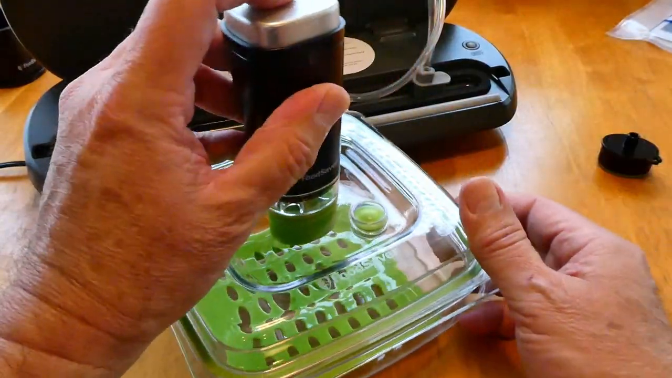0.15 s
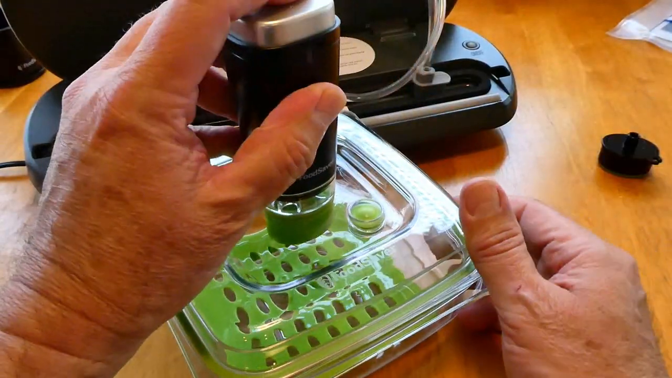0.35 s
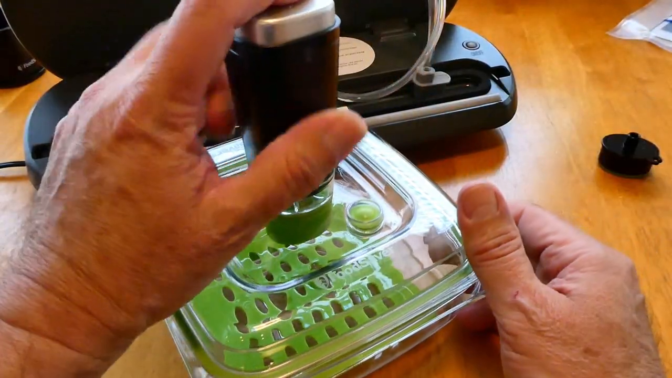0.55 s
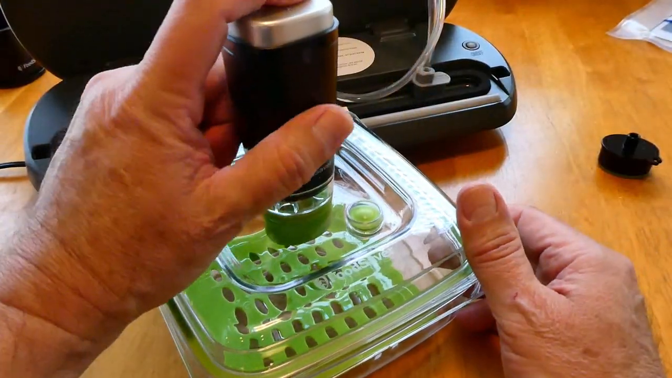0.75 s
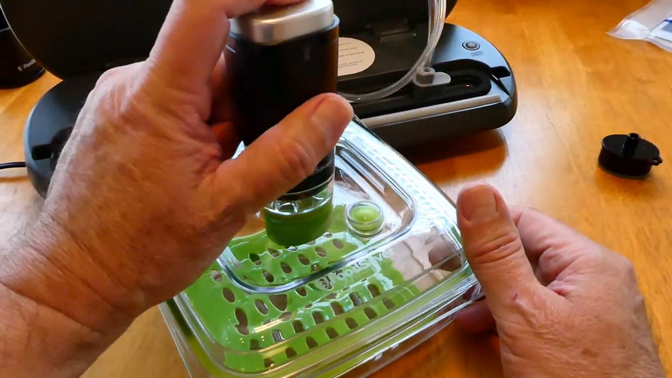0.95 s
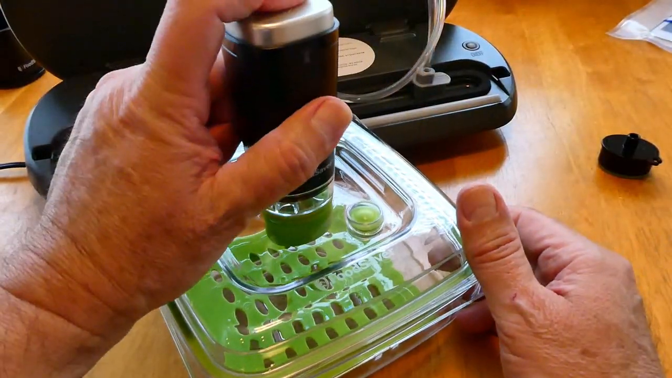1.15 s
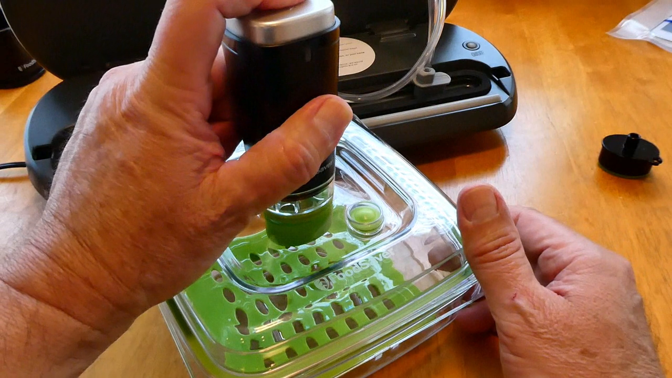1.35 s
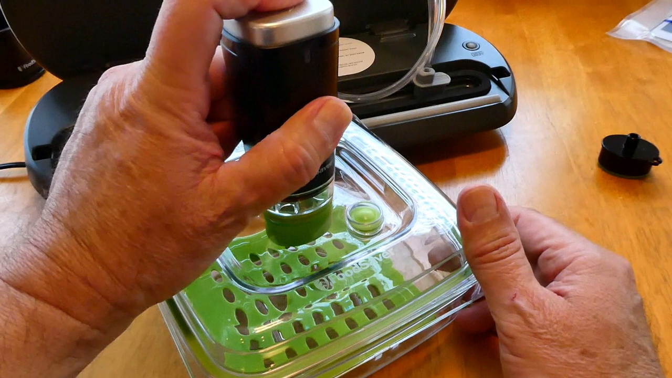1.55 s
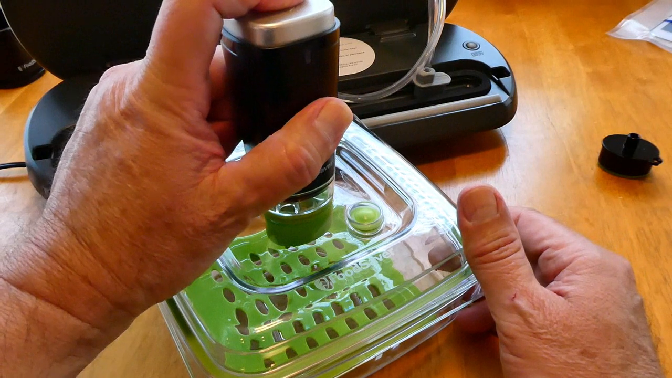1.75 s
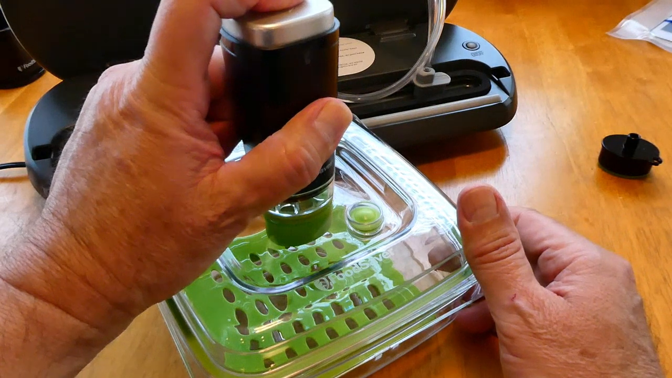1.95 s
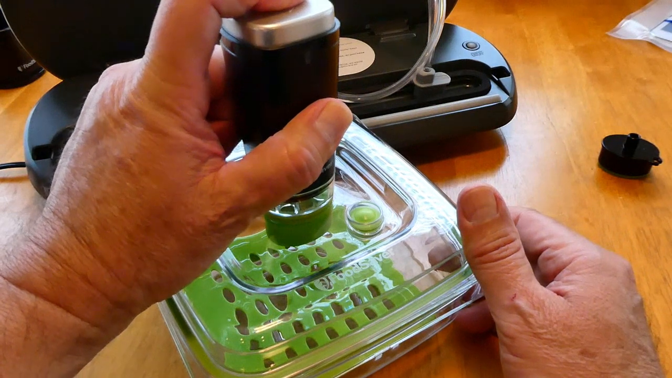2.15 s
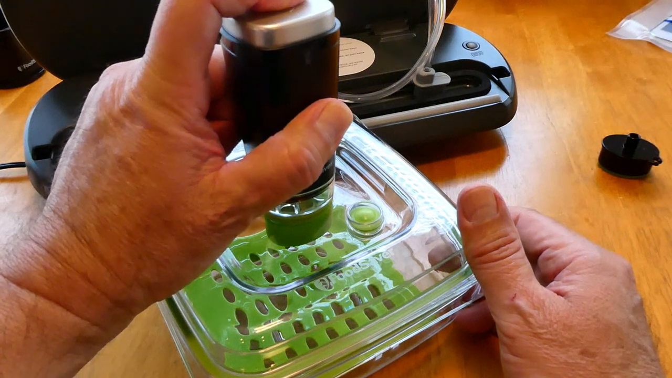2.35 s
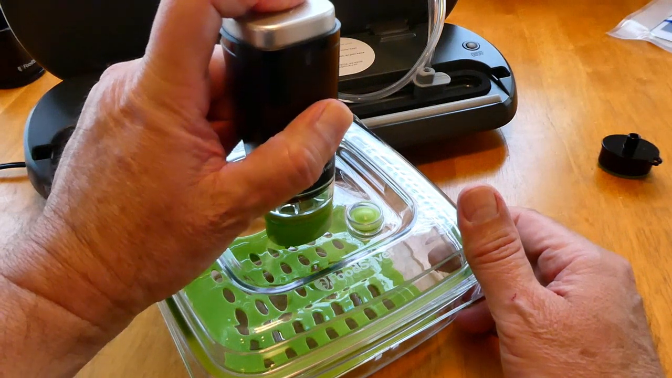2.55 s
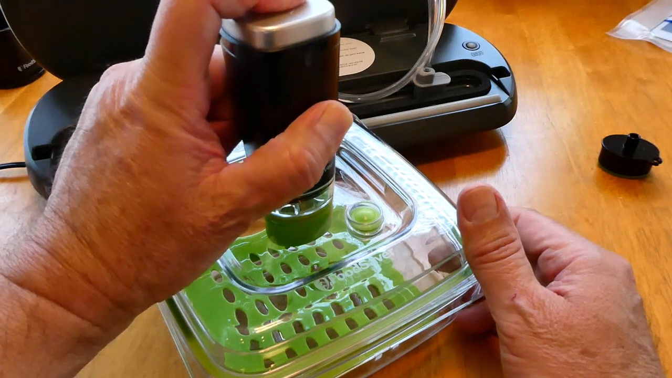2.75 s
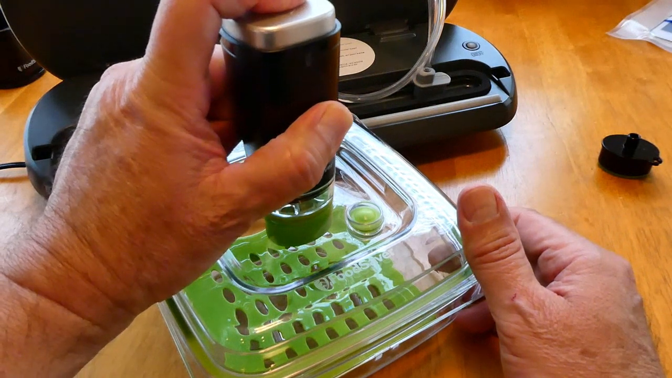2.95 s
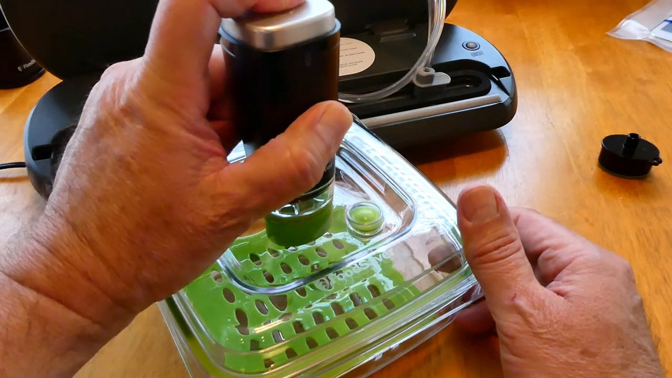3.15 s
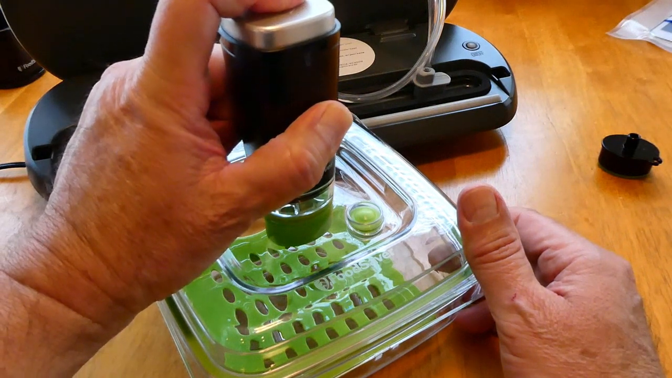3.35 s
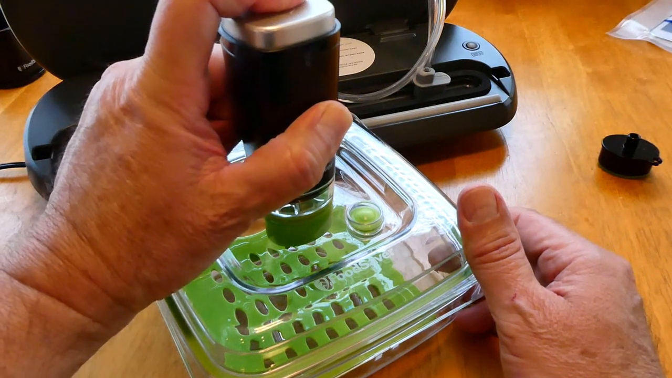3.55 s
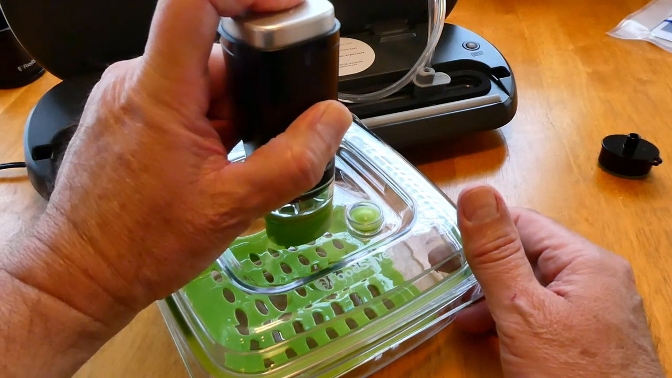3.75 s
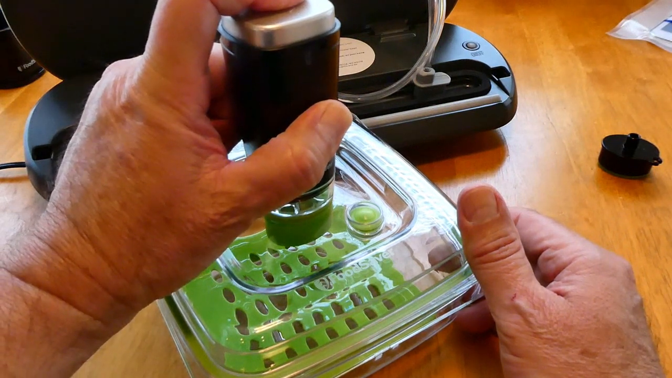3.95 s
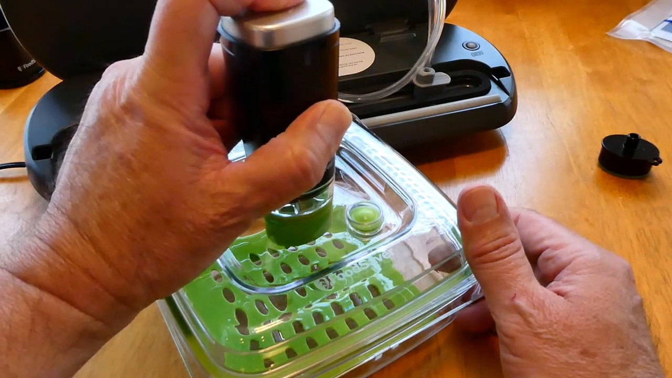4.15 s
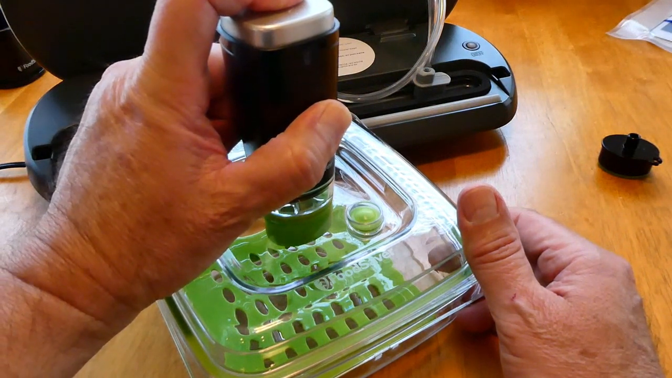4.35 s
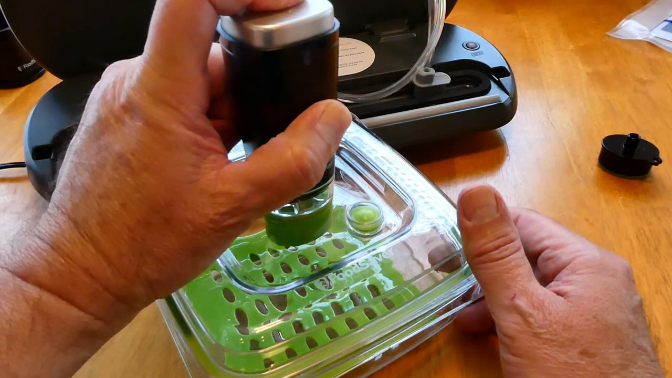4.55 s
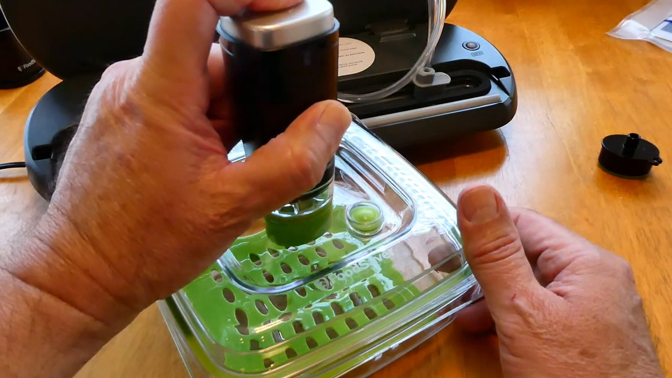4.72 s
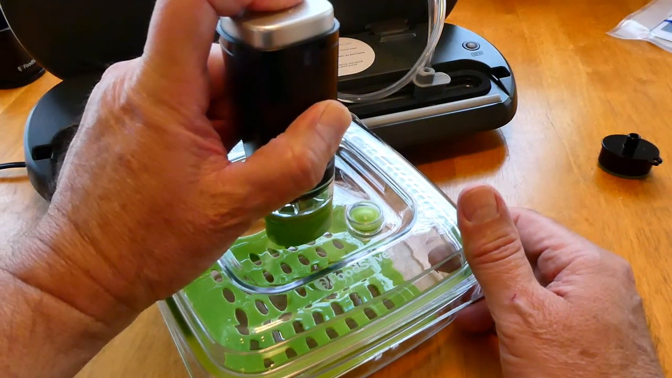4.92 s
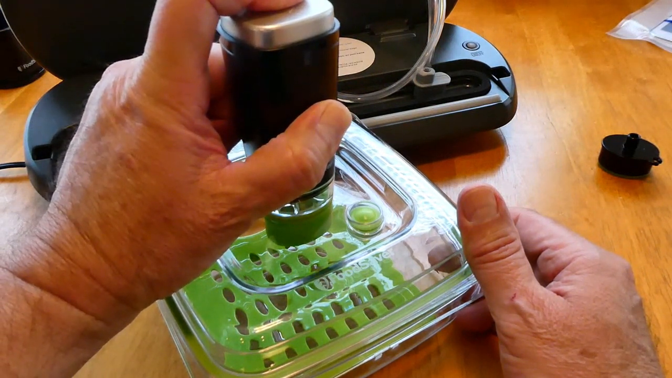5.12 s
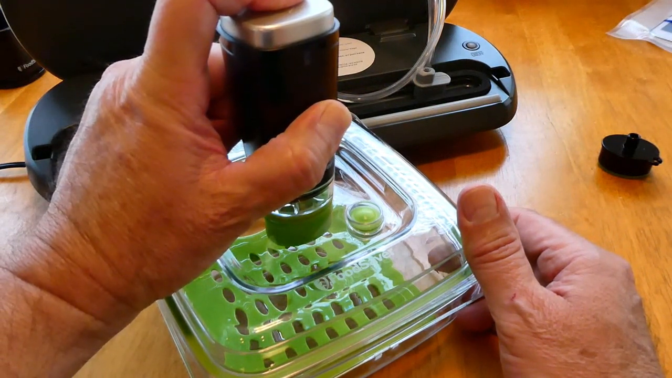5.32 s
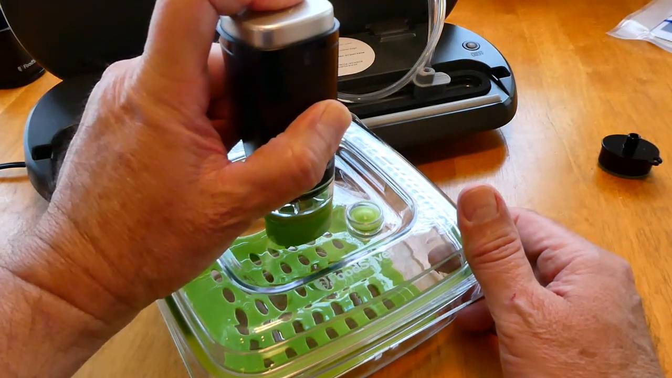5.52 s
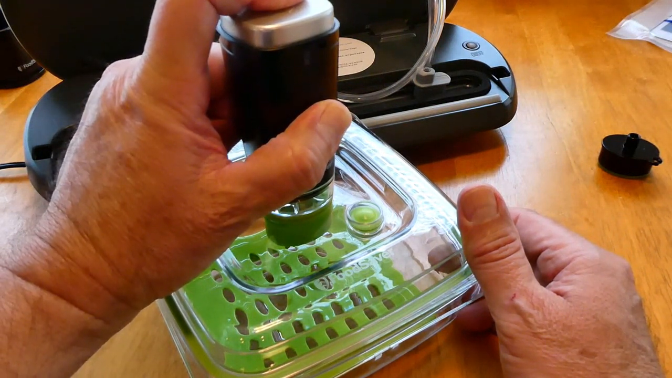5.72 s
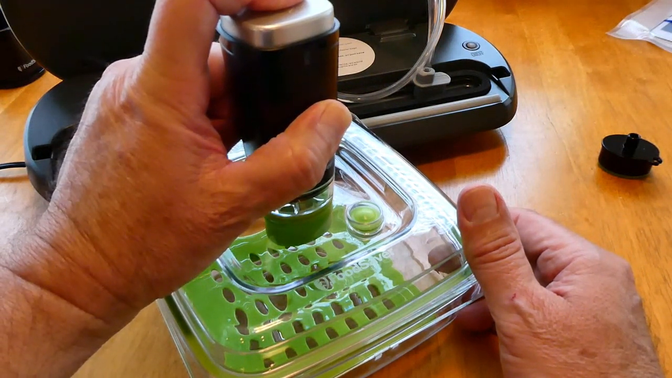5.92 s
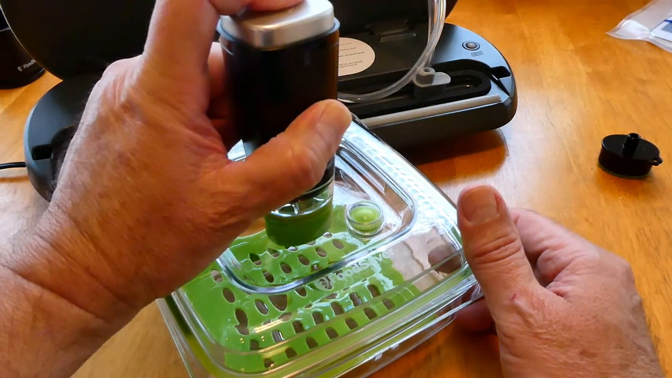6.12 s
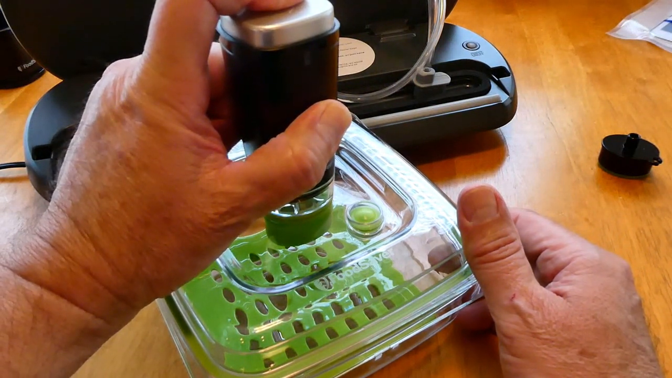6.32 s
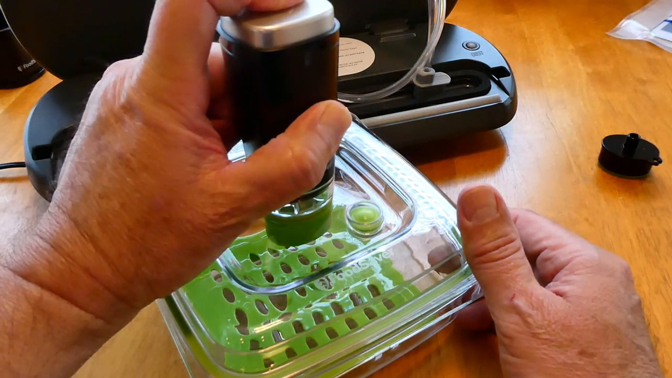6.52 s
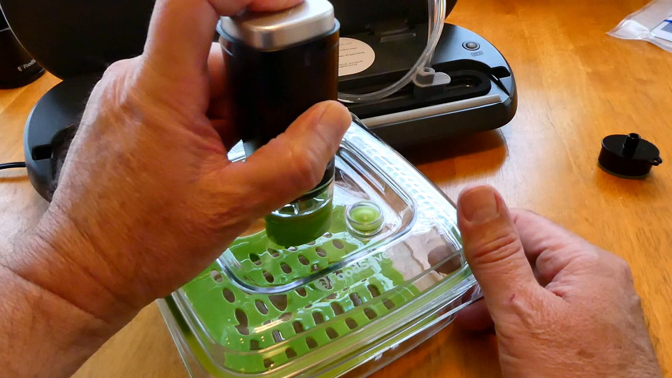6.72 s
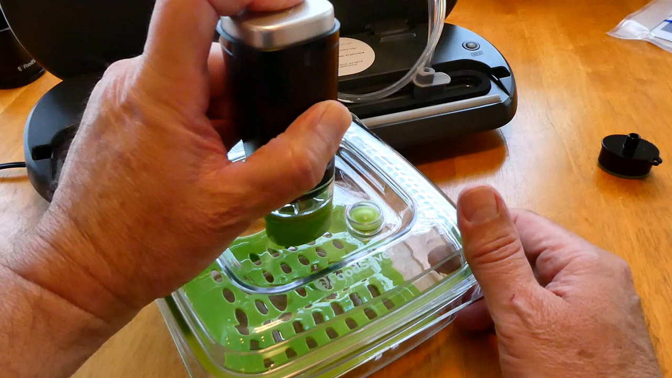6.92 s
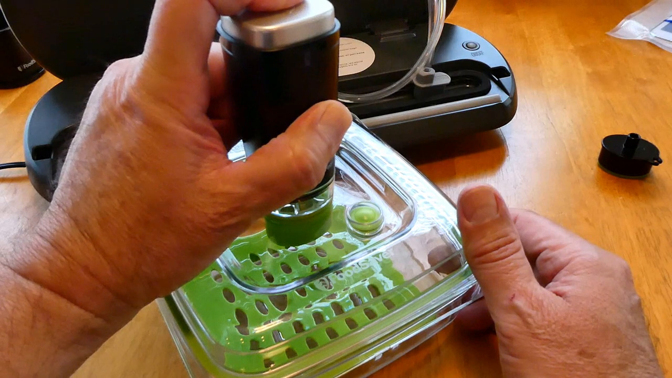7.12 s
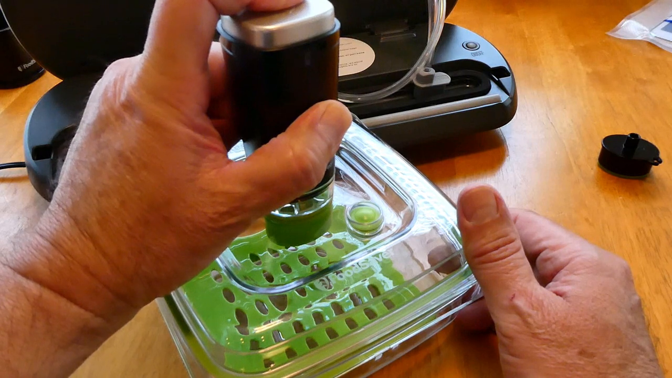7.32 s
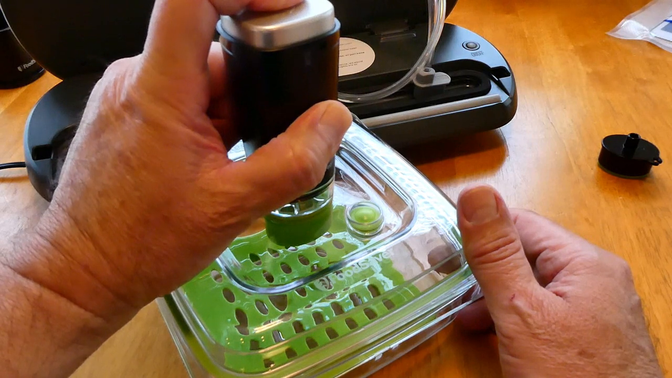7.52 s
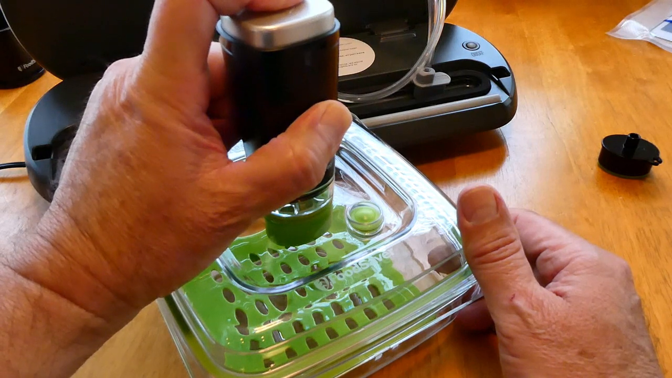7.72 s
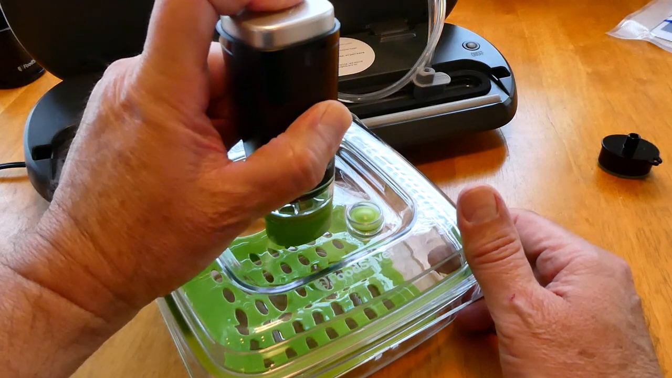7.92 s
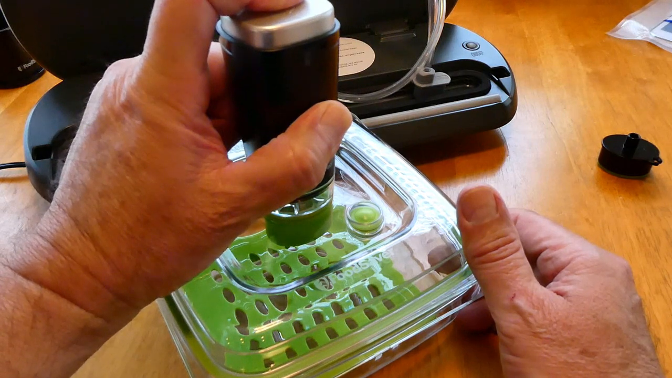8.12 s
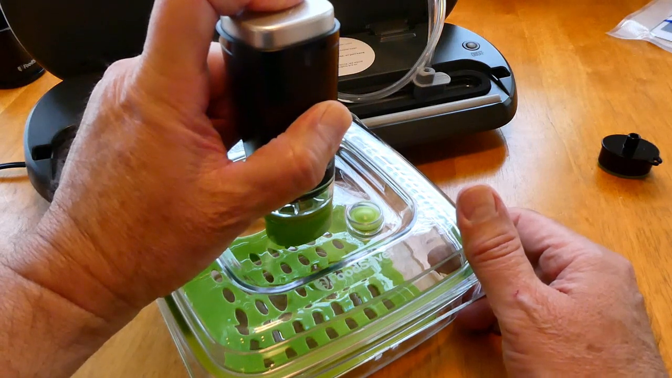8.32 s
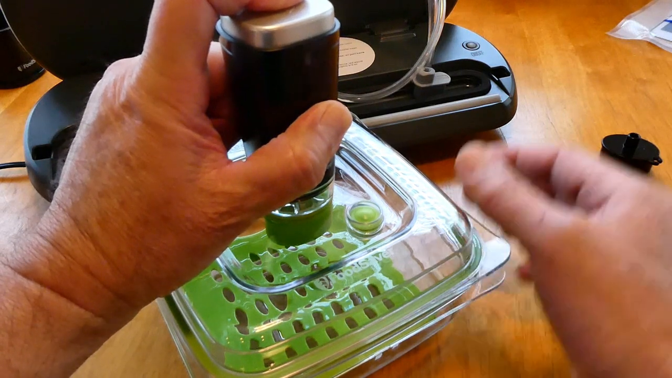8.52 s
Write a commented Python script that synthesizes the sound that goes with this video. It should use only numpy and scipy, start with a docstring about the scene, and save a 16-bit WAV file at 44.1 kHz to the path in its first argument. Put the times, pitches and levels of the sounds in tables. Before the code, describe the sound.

A plastic container slides and clicks on a table, then a small vacuum pump spins up and runs with a steady buzz.

```python
"""In a small room a plastic food container slides to rest on a table, excited by friction, while a cordless
vacuum pump bumps and clicks onto its lid. At about 1 s the motor spins up and drives a small piston,
three turns to a stroke: the gears rattle, the brushes fizz and periodic knocks make the housing buzz.
From about 1.5 s the lid is sealed, and the buzz changes colour as the vacuum builds. The plastic clicks
twice more, and the pump runs on at a nearly steady speed."""
import sys
import numpy as np
from scipy import signal
from scipy.fft import rfft, irfft, next_fast_len
from scipy.io import wavfile
from scipy.ndimage import map_coordinates

SR = 44100
rng = np.random.default_rng(int(sys.argv[2]) if len(sys.argv) > 2 else 0)


def generate_wav(sig):
    """Save sig (samples, or channels by samples) to the path in sys.argv[1] as 16-bit PCM at SR."""
    pcm = np.round(np.clip(np.atleast_2d(sig).T, -1, 1) * 32767).astype(np.int16)
    wavfile.write(sys.argv[1], SR, pcm)


N = 377937

# Likeness of the left and right noise (f/Hz, correlation)
COHERENCE = [(60, -0.69), (150, -0.099), (300, 0.34), (600, 0.11), (1300, 0.48), (2600, 0.71), (6000, 0.95),
             (14000, 0.71)]
# Spectra of room tone and of sliding friction (f/Hz, density level/dB)
AIR_SPECTRUM = [(25, -49), (50, -21), (100, -11.5), (150, -2.5), (220, -2.5), (300, 0), (450, -2),
                (750, -4), (1100, -16.5), (2300, -11), (3500, -26.5), (7000, -34), (15500, -33)]
FRICTION_SPECTRUM = [(30, -60), (90, -41), (200, -8), (380, -0.5), (550, -2.5), (1100, 0), (1600, -5),
                     (1900, -11), (4000, -13), (5500, -20.5), (10000, -26.5), (15500, -37)]
# Resonances of the room and of the container (f/Hz, half width/Hz, gain/dB)
ROOM_MODES = [(300, 20, 4.5), (385, 15, 1.5), (770, 31, 5)]
CONTAINER_MODES = [(233, 20, 12), (373, 23, 11), (687, 29, 9), (766, 16, 10), (894, 25, 2),
                   (1090, 16, 12.5)]
# Scrapes of fingers and pump foot on the lid (t/s, half length/s, level/dB)
RUBS = [(.17, 0.043, -50), (.23, 0.028, -51), (.305, 0.045, -51), (0.44, 0.018, -63), (.76, 0.026, -68)]
# Impacts of the pump's foot on the lid (t/s, level/dB)
TAPS = [(0.0532, -29), (.3285, -41), (0.7217, -37.5)]
# Booms of the settling container (t/s, level/dB, f/Hz)
BUMPS = [(.068, -37, 225), (.125, -37.5, 232), (.548, -43, 298), (.882, -44, 296)]
# Clicks of pump and lid (t/s, level/dB, relative thud level/dB, tilt/(dB per octave))
CLICKS = [(.1086, -25, -25, 4), (.1095, -14.5, -27, 1.5), (.1106, -14.5, -27, -1.5), (.119, -32, -10, -1),
          (.1517, -32, -8, 1.5), (.253, -35, -12, 2), (.329, -40, -8, 2), (.5405, -34.5, 0, 1),
          (.5457, -37.5, 0, 0), (.558, -43, 13, 4), (.5725, -38, 0, 6), (.599, -36, -11, -1),
          (.6517, -32, -18, -2), (.653, -36, -17, 2), (.888, -60, 22, 0), (1.979, -27, -15, 3),
          (2.591, -26, -12, 3)]
# Spectra of a tap, of snapping plastic and of the knocked container (f/Hz, density level/dB)
TAP_SPECTRUM = [(200, -16), (800, 2), (1400, -1), (2100, 1), (3200, -12), (6000, -26), (9000, -36),
                (15500, -46)]
SNAP_SPECTRUM = [(300, -30), (1600, -8), (2100, 2), (2650, 10), (3200, 2), (4400, -1.5), (5700, -1.5),
                 (7200, -4.5), (9300, 2.5), (10800, 0), (12000, -10), (15500, -13)]
THUD_SPECTRUM = [(30, -55), (80, -33), (230, 8), (750, 1), (1100, -7), (2200, -11), (4000, -33),
                 (12000, -47)]
# Modes of the lid (f/Hz, relative level/dB, T60/s)
LID_MODES = [(2140, -27.5, 0.15), (2770, -30, .08), (3830, -36, .08)]
# Reverberation time of the room (f/Hz, T60/s)
ROOM_T60 = [(200, 0.35), (2500, 0.34), (7000, 0.31), (14000, 0.28)]
# Piston speed: spin-up, a step as the lid seals, a slow sway with the load (t/s, stroke rate/Hz)
STROKE_RATE = [(1.03, 58.6), (1.2, 62.66), (1.3, 63.76), (1.38, 64.75), (1.55, 64.57), (1.62, 65.62),
               (1.71, 65.6), (1.81, 65.96), (2.25, 66.78), (2.43, 66.76), (2.67, 67.04), (3.05, 66.82),
               (3.35, 67.13), (3.75, 67.21), (4, 67.07), (4.2, 67.2), (4.57, 67.25), (4.7, 67.05),
               (5.3, 67.12), (6.2, 67.03), (6.7, 67.18), (7.3, 66.93), (7.5, 67.02), (8, 66.95),
               (8.3, 67.03), (8.55, 66.95)]
# Spectra of loose gears and of brush and air fizz (f/Hz, density level/dB)
GEAR_SPECTRUM = [(90, -12), (170, -2.5), (300, -3), (500, -1), (750, -0.5), (1000, 1.5), (1400, 0.5),
                 (1800, -2.5), (2300, -1), (2750, 0), (3020, -1), (3300, -30), (6000, -38)]
FIZZ_SPECTRUM = [(1500, -46), (3100, -1), (3750, -5), (4500, -2.5), (5200, -4.5), (6000, -2.5), (6750, 0.5),
                 (7300, -8), (9000, -5.5), (9800, -10), (10800, -3.5), (12000, -5), (13000, -1.5),
                 (13500, -4), (15500, -9.5)]
# Resonances of the pump case and in the fizz (f/Hz, half width/Hz, gain/dB)
CASE_MODES = [(904, 21, 4.5), (2670, 60, 3.5)]
FIZZ_PEAKS = [(6600, 380, 1.5), (10950, 350, 4.5), (14870, 280, 16.5)]
# Stroke harmonics (order, level in free air/dB, level under vacuum/dB, left minus right/dB)
HARMONICS = [(3, -54, -50.3, 0), (6, -59, -53, 0), (9, -46.5, -56.5, 2), (10, -62, -54.5, -2),
             (11, -61, -53.5, -1), (12, -44, -46.7, -1), (13, -63, -51, 0), (14, -40.5, -47, -1),
             (15, -44, -44, -3), (16, -55, -58.5, 2), (17, -70, -51, 1), (18, -58, -49.5, -6),
             (19, -61, -64, 0), (20, -54, -50, -1), (21, -50, -49, -2), (23, -56, -50.5, -1),
             (24, -58, -61, 0), (25, -56, -68, 0), (26, -55, -68, 0), (27, -71, -61, 0), (29, -59, -57, -1),
             (31, -66, -61, 0), (32, -61, -54, -1), (33, -47.5, -58, 0), (34, -54, -46, 1),
             (35, -54, -55, -4), (36, -51, -49.5, -4), (37, -45.5, -43.5, -2), (38, -55, -58, 0),
             (39, -49, -44, 1), (40, -54, -50.5, 0), (41, -43.5, -45, 1), (42, -53, -60, 3),
             (43, -51, -56.5, 1), (45, -48, -55, 2)]
# Piston and valve contacts via body and housing, valves flapping freely (phase/strokes, level/dB)
FREE_BODY_KNOCKS = [(.17, -1), (.26, 0), (.72, -5), (.88, -2)]
FREE_HOUSING_KNOCKS = [(.47, -2), (.58, -2), (.72, 0), (.83, 0)]
# The same contacts once the vacuum holds the valves (phase/strokes, level/dB)
LOADED_BODY_KNOCKS = [(.098, 0), (.169, 0), (.702, 1), (.846, 0)]
LOADED_HOUSING_KNOCKS = [(.129, -3), (.201, -4), (.799, 0), (.976, -1)]
# Harmonics that bloom or fade during spin-up and while the pump runs (order, t/s, half length/s, gain/dB)
SWELLS = [(12, 1.15, .15, -8), (29, 1.15, .08, 8), (33, 1.15, .15, -8), (37, 1.15, .15, -6),
          (9, 1.85, .2, 4), (15, 2.0, .25, -5), (18, 2.0, .35, -11), (19, 1.8, .2, 14), (23, 2.05, .35, 7),
          (24, 2.4, .6, 10), (41, 1.74, .15, 4), (42, 1.72, .12, 7), (34, 1.9, .25, 5), (40, 1.8, .2, 6),
          (41, 2.2, .25, -7), (13, 2.1, .9, 4), (35, 2.0, .25, 6), (21, 2.4, .25, 4), (45, 2.2, .7, -9),
          (33, 2.6, .6, 7), (38, 2.7, 1.3, -10), (32, 2.8, 2, -5), (37, 2.6, .6, 1.5), (14, 3.2, 1.5, 6),
          (20, 3.3, 1.2, -8), (39, 3.4, .7, 3.5), (34, 3.7, .55, 4), (40, 3.8, 1.4, 6), (41, 3.4, .9, 3),
          (37, 4.9, .9, -4), (18, 5.3, 1, -4), (23, 3.8, .8, -3), (15, 8.3, .8, 2)]

START_S, SEAL_S = 1.03, 1.53  # the pump is switched on; the lid seals
NOISE_RISE_S, TONE_RISE_S, SETTLE_S = 0.061, 0.1, 0.48  # noise arrives, buzz forms, chatter ends
FREE_HZ, FULL_HZ = 64.8, 67.25  # stroke rate in free air and under vacuum


def amp(db):
    """Amplitude ratio of a level in decibels."""
    return 10 ** (np.asarray(db) / 20)


def along(points, hz):
    """Interpolation of (f/Hz, value) points on a logarithmic frequency axis."""
    f, v = np.transpose(points)
    return np.interp(np.log(hz + 1), np.log(f + 1), v)


def resonance_db(peaks, hz):
    """Gain of a set of resonances, each a Lorentzian peak in decibels."""
    return sum(db / (1 + ((hz - centre) / width) ** 2) for centre, width, db in peaks)


def since(s):
    """Seconds elapsed since time s, zero before it."""
    return np.maximum(np.arange(N) / SR - s, 0)


def rise(s, lag_s):
    """First-order step response from 0 to 1, beginning at time s."""
    return 1 - np.exp(-since(s) / lag_s)


def bell(s, width_s):
    """Gaussian envelope centred on time s."""
    return np.exp(-((since(0) - s) / width_s) ** 2)


def wobble(rate):
    """Smooth random modulation: a spline through `rate` Gaussian knots a second."""
    knots = rng.standard_normal(int(N * rate / SR) + 4)
    coarse = np.linspace(0, N, 8 * len(knots))
    return np.interp(np.arange(N), coarse, map_coordinates(knots, [coarse * rate / SR]))


def filtered(x, response):
    """Linear filtering: the spectrum of x times a frequency response."""
    m = next_fast_len(N + SR // 2)
    return irfft(rfft(x, m) * response(np.fft.rfftfreq(m, 1 / SR)), m)[..., :N]


def noise(spectrum, peaks=(), gate=1, ripple_db=0):
    """Source and filter: gated white noise, coloured into partly coherent stereo of rms 1."""
    def colour(hz):
        grid = np.arange(0, SR / 2, 45)
        ripple = ripple_db * np.interp(hz, grid, rng.standard_normal(len(grid)))  # many small resonances
        db = along(spectrum, hz) + resonance_db(peaks, hz) + ripple
        spread = np.arccos(np.clip(along(COHERENCE, hz), -1, 1)) / 2
        return amp(db) * np.array([np.cos(spread), np.sin(spread)])
    mid, side = filtered(gate * rng.standard_normal((2, N)), colour)
    stereo = np.array([mid + side, mid - side])
    return stereo / np.sqrt(np.mean(stereo ** 2) + 1e-20)


def room_tone(level_db=-48.5):
    """Standing waves of the room colour a steady background noise."""
    return amp(level_db) * noise(AIR_SPECTRUM, ROOM_MODES)


def slide(push_end_s=0.063, stop_s=0.094, squeak_hz=1077, squeak_stop_s=0.023):
    """Friction excites the container's modes and its foot squeaks; both decay after the push."""
    coasting = since(push_end_s)
    judder = amp(-39.5 + 2 * wobble(58)) * np.exp(-coasting / stop_s)
    cycles = squeak_hz * since(0) + 0.15 * wobble(42)
    squeak = amp(-46.5) * np.exp(-coasting / squeak_stop_s) * np.sin(2 * np.pi * cycles)
    return judder * noise(FRICTION_SPECTRUM, CONTAINER_MODES, gate=amp(0.5 * wobble(295))) + squeak


def fingers(release_s=0.27, grain_db=2.0):
    """Friction of fingers on plastic, with a few short scrapes, fades once the pump runs."""
    grip = amp(-56 + wobble(12.7)) * np.exp(-since(START_S) / release_s)
    scrapes = sum(amp(db) * bell(s, width) for s, width, db in RUBS)
    return (grip + scrapes) * noise(FRICTION_SPECTRUM, gate=amp(grain_db * wobble(500)))


def taps(t60=0.017):
    """Heavily damped impacts: the pump's foot meets the lid with a dull clack."""
    envelope = sum(amp(db - 60 * since(s) / t60) * (since(s) > 0) for s, db in TAPS)
    return envelope * noise(TAP_SPECTRUM)


def reverberation(x):
    """A diffuse field decays exponentially, the treble soonest."""
    hz, t, spectra = signal.stft(rng.standard_normal((2, SR // 2)), SR, nperseg=256)
    decay = amp(-60 * t / along(ROOM_T60, hz)[:, None])
    tail = signal.istft(spectra * decay, SR, nperseg=256)[1]
    return signal.fftconvolve(x.mean(axis=0)[None], tail / np.linalg.norm(tail[0]), axes=1)[:, :N]


def bumps(t60=0.15, attack_s=0.008):
    """Damped free vibration: the hollow container rocks and booms in one low mode at a time."""
    return sum(amp(db - 60 * since(s) / t60) * rise(s, attack_s) * np.sin(2 * np.pi * hz * since(s))
               for s, db, hz in BUMPS)


def snap(tilt_db, t, crumble_db=-7, crumble_t60=0.007):
    """Impulse response of stiff plastic to one sharp release and a crumble of tiny contacts."""
    hz = np.fft.rfftfreq(len(t), 1 / SR)
    octaves = np.log2(np.maximum(hz, 1500) / 5000)
    cepstrum = irfft(np.log(amp(along(SNAP_SPECTRUM, hz) + tilt_db * octaves)))
    causal = (t > 0) * (t < t[-1] / 2)  # minimum phase: ringing only follows the contact
    ring = irfft(np.exp(rfft(2 * cepstrum * causal)))
    contact = (t == 0) + amp(crumble_db - 60 * t / crumble_t60) * rng.standard_normal((2, len(t)))
    return signal.fftconvolve(contact, ring[None] / np.linalg.norm(ring), axes=1)[:, :len(t)]


def clicks(thud_t60=0.042, snap_db=2.0, thud_db=-7):
    """Impulsive excitation: each snap rings the lid's modes and knocks the hollow container."""
    out, thud = np.zeros((2, N)), np.zeros(N)
    t = np.arange(2 * (SR // 10)) / SR
    for s, db, knock_db, tilt_db in CLICKS:
        span = slice(round(s * SR), round(s * SR) + len(t))
        lid = 0
        for hz, mode_db, t60 in LID_MODES:
            decay = amp(mode_db + rng.normal(0, 2.0) - 60 * t / t60)
            lid += decay * np.sin(2 * np.pi * (hz * t + rng.random()))
        out[:, span] += amp(db) * (amp(snap_db) * snap(tilt_db, t) + lid)
        thud[span] += amp(db + knock_db + thud_db - 60 * t / thud_t60)
    return out + thud * noise(THUD_SPECTRUM)


def gear_rattle(stroke, ring, depth, spike_db=1.5):
    """Backlash: uneven gear impacts ring the case, most strongly while the piston pushes."""
    push = 1 + depth * np.cos(2 * np.pi * (stroke - .96))
    modes = [(hz, width, ring * db) for hz, width, db in CASE_MODES]
    return noise(GEAR_SPECTRUM, modes, gate=push * amp(spike_db * wobble(700)))


def brush_fizz(stroke, depth=0.13, flutter_db=0.5):
    """Amplitude modulation: the noise of the brushes swells once per motor turn."""
    turn = 3 * stroke
    pulse = 1 + depth * np.cos(2 * np.pi * (turn - .52))
    return noise(FIZZ_SPECTRUM, FIZZ_PEAKS, gate=pulse * amp(flutter_db * wobble(40)), ripple_db=2.5)


def knock_phase(knocks, order):
    """Phase of one Fourier component of a stroke's knocks."""
    share, db = np.transpose(knocks)
    return np.angle(np.sum(amp(db) * np.exp(-2j * np.pi * order * share)))


def piston_buzz(stroke, speed, body_hz=500, housing_hz=1750, draw_s=0.44, grip_db=1.16):
    """Periodic knocks form a harmonic series: low in the motor, mid in the body, high in the housing."""
    vacuum = rise(SEAL_S, draw_s)
    labour_db = -0.5 * np.maximum(FREE_HZ - speed, 0)  # a slow piston knocks softly
    scatter_db = 0.6 + 4 * (1 - rise(START_S, TONE_RISE_S))  # knocks are most uneven at the start
    body_db, housing_db = scatter_db * wobble(190), scatter_db * wobble(230)
    out = np.zeros((2, N))
    for order, free_db, loaded_db, pan_db in HARMONICS:
        hz = order * FREE_HZ
        low = hz < housing_hz
        # the harmonics line up on the knocks, so each stroke chugs
        free = knock_phase(FREE_BODY_KNOCKS if low else FREE_HOUSING_KNOCKS, order)
        loaded = knock_phase(LOADED_BODY_KNOCKS if low else LOADED_HOUSING_KNOCKS, order)
        shift = np.angle(np.exp(1j * (loaded - free)))
        smear = rng.normal(0, 0.37 if low else 0.5)  # reflections blur the alignment
        phase = 2 * np.pi * order * stroke + free + vacuum * shift + smear
        # during spin-up each harmonic sweeps through the resonances of the case
        running_db = resonance_db(CASE_MODES, order * np.maximum(speed, FREE_HZ))
        sweep_db = 1.9 * (resonance_db(CASE_MODES, order * speed) - running_db)
        drift_db = grip_db * min(hz / 1200, 1) * wobble(1.5)  # the shifting grip sways the treble most
        swell_db = sum(db * bell(s, width) for k, s, width, db in SWELLS if k == order)
        load_db = free_db + vacuum * (loaded_db - free_db) + swell_db
        knock_db = 0 if hz < body_hz else body_db if low else housing_db
        level = amp(knock_db + load_db + labour_db + sweep_db + drift_db + wobble(14))
        lag_rad = 0.17 * low  # low tones arrive later on the left
        out[0] += level * amp(pan_db / 2) * np.cos(phase - lag_rad / 2)
        out[1] += level * amp(-pan_db / 2) * np.cos(phase + lag_rad / 2)
    return out


def pump(jitter=0.00035, wander=0.0014, fizz_db_per_hz=0.4):
    """Quasi-periodic drive: one stroke phase times gears, brushes and piston; early chatter dies away."""
    speed = np.interp(since(0), *np.transpose(STROKE_RATE))
    stroke = np.cumsum(speed) / SR + jitter * wobble(45) + wander * wobble(6)
    on, tonal, settled = (np.clip(since(START_S) / rise_s, 0, 1)
                          for rise_s in (NOISE_RISE_S, TONE_RISE_S, SETTLE_S))
    chatter = amp(-42) * (1 - settled ** 2) * gear_rattle(stroke, ring=3.3, depth=0.33)
    gears = amp(-44) * gear_rattle(stroke, ring=0.74, depth=0.092)
    brushes = amp(-41.5 - fizz_db_per_hz * (FULL_HZ - speed)) * brush_fizz(stroke)
    return tonal * piston_buzz(stroke, speed) + on * (chatter + gears + brushes)


def scene(reverb_db=-4, pan_db=-0.6, echo_s=0.0061, echo_db=-16):
    """Superposition of handling, pump and room tone; impacts echo off a near surface and reverberate."""
    hits = clicks() + taps() + bumps()
    echo = amp(echo_db) * filtered(hits, lambda hz: np.exp(-2j * np.pi * hz * echo_s))
    handling = hits + echo + amp(reverb_db) * reverberation(hits) + slide() + fingers()
    return amp([[pan_db], [-pan_db]]) * handling + pump() + room_tone()


def record(dry, bass_hz=50, top_hz=15480):
    """Band limiting: a first-order bass roll-off and a steep treble cut."""
    return filtered(dry, lambda hz: hz / np.hypot(hz, bass_hz) / np.sqrt(1 + (hz / top_hz) ** 240))


dry = scene()
out = record(dry)
generate_wav(out)
```